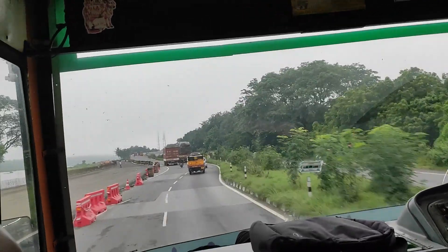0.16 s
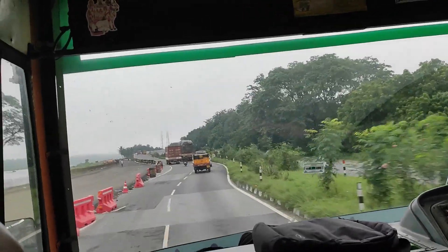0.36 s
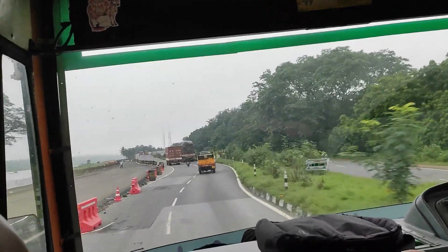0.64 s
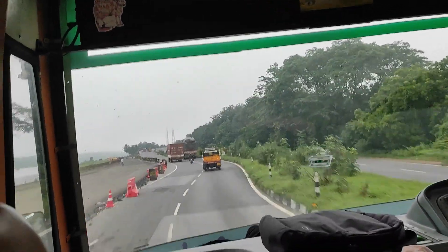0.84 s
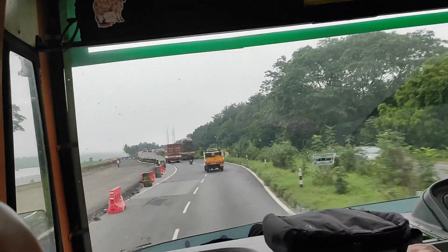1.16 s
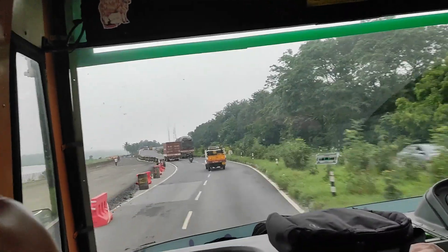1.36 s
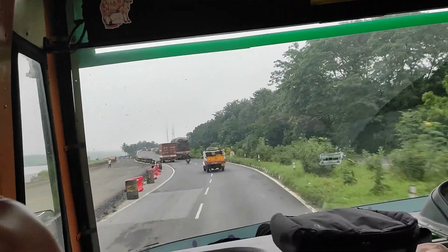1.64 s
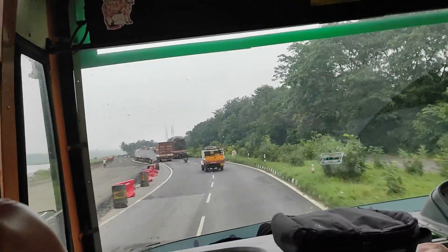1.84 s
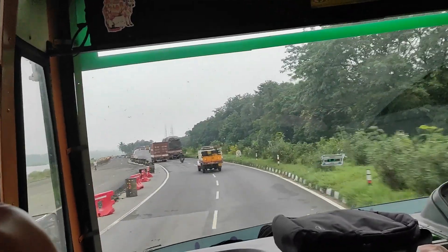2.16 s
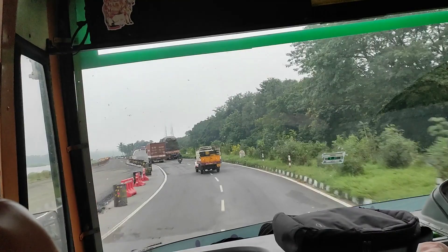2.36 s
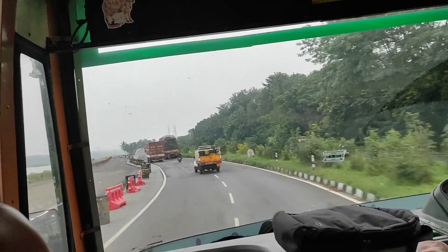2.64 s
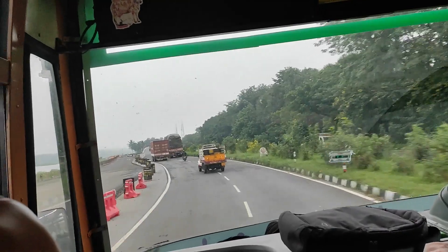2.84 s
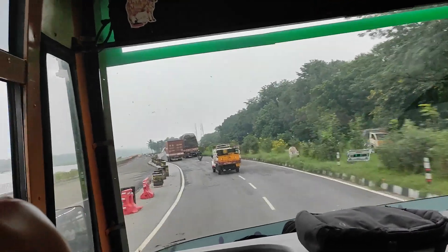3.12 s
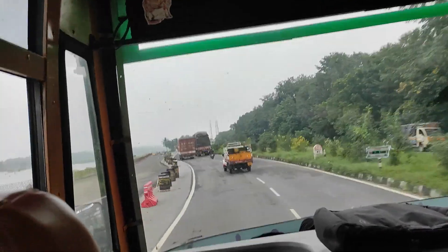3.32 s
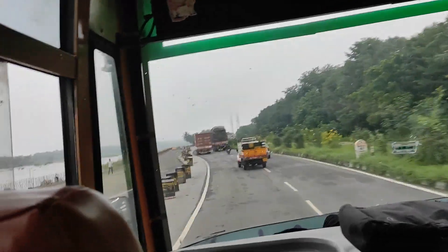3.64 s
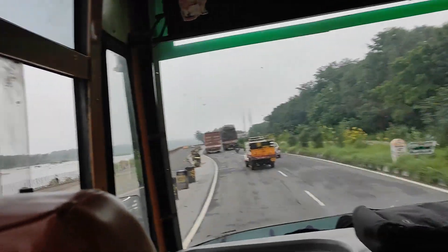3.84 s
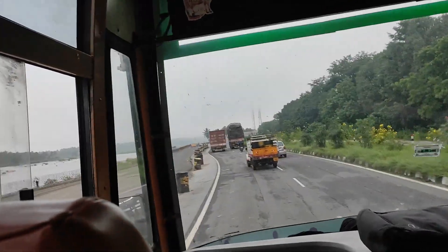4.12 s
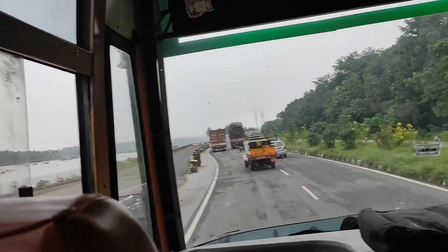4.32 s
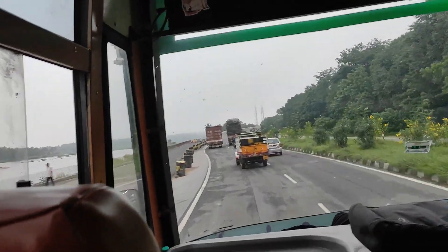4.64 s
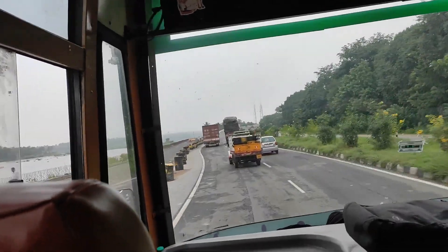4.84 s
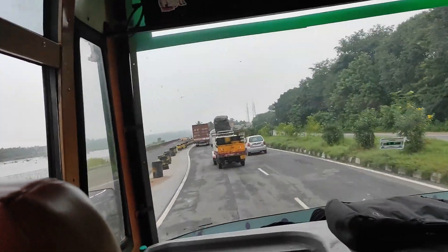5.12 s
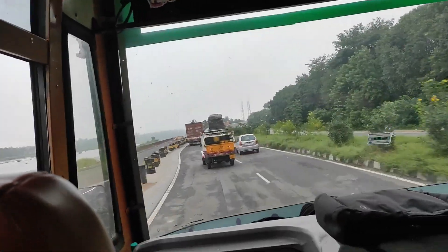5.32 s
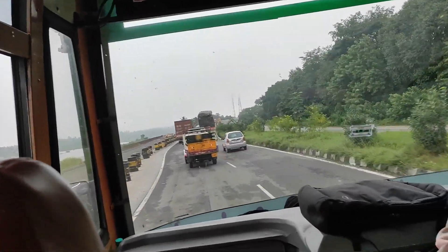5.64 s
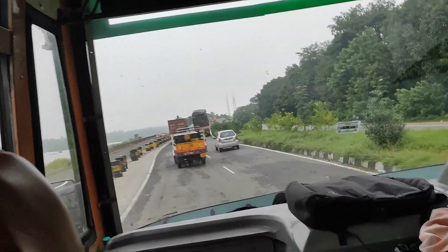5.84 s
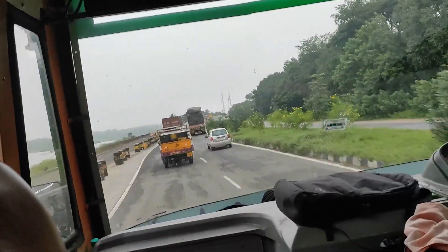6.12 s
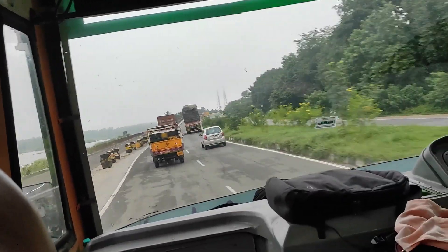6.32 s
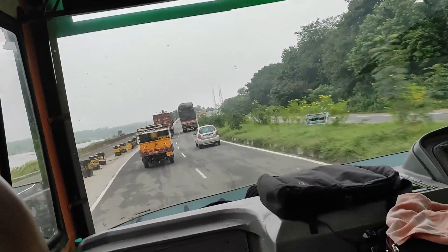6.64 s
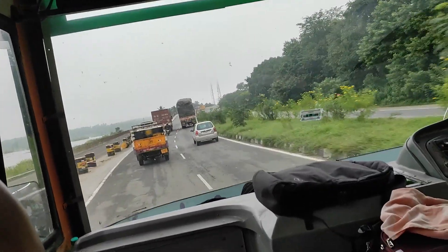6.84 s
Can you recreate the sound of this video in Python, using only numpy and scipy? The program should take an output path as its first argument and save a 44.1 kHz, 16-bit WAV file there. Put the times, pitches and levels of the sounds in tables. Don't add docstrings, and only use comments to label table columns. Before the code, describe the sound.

A close, boomy bus cab on a highway: deep uneven shell thumps, tyre roar and soft air hiss. Engine load rises, one quick, bright, buzzing horn blast bursts out above it, and the background dips briefly. A dull bouncing panel knock follows. Later the ride is slightly calmer, with a sinking driveline hum, gritty rattles, tiny metallic pings and growling tyres, until the throttle opens at the end.

```python
import sys
import numpy as np
from scipy import signal
from scipy.fft import rfft, irfft, next_fast_len
from scipy.io import wavfile
from scipy.ndimage import uniform_filter1d

SR = 44100
rng = np.random.default_rng(int(sys.argv[2]) if len(sys.argv) > 2 else 0)


def transcribe(u):
    v = np.clip(np.atleast_2d(u).T, -1, 1)
    q = np.round(v * 32767).astype(np.int16)
    wavfile.write(sys.argv[1], SR, q)


def volts(x):
    e = np.asarray(x, float) / 20
    return 10 ** e


N = 307813
T = np.arange(N) / SR
M = next_fast_len(N)
HZ = np.maximum(np.arange(M // 2 + 1) * SR / M, 1)

# [t/s, effort above cruising/dB]
EFFORT = [(0, 1.5), (.43, 1), (.8, 4.5), (1.4, 6.5), (2.2, 5.5), (2.72, 6), (3.1, 2.5), (3.4, -0.2),
          (3.7, 4.5), (3.85, 0.5), (4.6, -1.1), (5.2, 0.9), (5.72, -1.9), (6.2, -3), (6.6, -0.2), (6.98, 2)]
# starts, rise, ends, fall, all in s
REED_S = (2.79, 0.036, 2.924, 0.125)
SECOND_S = (2.79, 0.02, 2.838, 0.03)


def unit(x):
    return x / np.sqrt(np.mean(x ** 2))


def curve(rows):
    s, *columns = np.transpose(rows)
    return [np.interp(T, s, c) for c in columns]


def at(rows, hz):
    f, db = np.transpose([row[:2] for row in rows])
    return np.interp(np.log(hz), np.log(f), db)


def gain_of(rows):
    return volts(at(rows, HZ))


def sound(spectrum):
    return irfft(spectrum, M)[..., :N]


def shaped(x, gain):
    return sound(rfft(x, M) * gain)


def ring(hz, width):
    return 1 / (1 + 1j * (HZ ** 2 - hz ** 2) / (HZ * width))


def smooth_twice(x, k):
    return uniform_filter1d(uniform_filter1d(x, k), k)


def walk(rate):
    k = int(SR / rate)
    held = np.repeat(rng.standard_normal(N // k + 1), k)
    return unit(smooth_twice(held, k)[:N])


def gate(on, rise, off, fall):
    return np.clip(np.minimum((T - on) / rise, 1 - (T - off) / fall), 0, 1)


def swells(rows):
    return sum(size * np.exp(-((T - s) / half) ** 2) for s, size, half in rows)


def dying(s, fade, hold=0):
    return (T >= s) * np.exp(-np.maximum(T - s - hold, 0) / fade)


def ports():
    # [f/Hz, level/dB]
    side_share = [(25, -30), (60, -38), (130, -10.5), (280, -10.5), (620, -2), (1300, 1.5), (2900, -1),
                  (6300, 0), (13700, -1.5)]
    # [f/Hz, level/dB]
    lean = [(60, 1), (110, 2.5), (200, 0), (370, -0.5), (670, 1.5), (1230, -1), (2250, 0), (4110, -4.5),
            (7510, 2.5), (13700, -4)]
    mid, side = rfft(rng.standard_normal((2, M)))
    side = side * gain_of(side_share)
    lag = np.exp(-1j * np.pi * HZ * 0.0001 * np.exp(-HZ / 1500))
    lean_db = at([(25, 0.7)] + list(lean), HZ)
    return np.array([(mid + side) * lag, (mid - side) / lag]) * volts(np.outer([0.5, -0.5], lean_db))


def cabin():
    # [f/Hz, level per Hz/dB]
    roar = [(32, -14.5), (55, 0), (65, -4), (111, -5.5), (163, -13.5), (193, -13.5), (265, -19.5),
            (298, -18.5), (438, -22), (509, -25), (688, -26.5), (1180, -32), (3000, -41), (3900, -71),
            (6600, -120)]
    # [f/Hz, level per Hz/dB]
    ports_early = [(3000, 0.5), (4500, -6.5), (6000, -10), (7500, -12), (9000, -17.5), (9600, -26),
                   (10600, -22), (11500, -19.5), (12500, -16), (14300, -27)]
    ports_late = [(3000, 0.5), (4500, -7), (5700, -7.5), (7000, -5), (7800, -10), (8500, -15.5),
                  (9500, -16), (10300, -17.5), (12000, -15), (14300, -16)]
    # [t/s, level/dB, half length/s]
    patches = [(.02, 5, 0.034), (.23, 0.5, .04), (.31, -4.5, .03), (.43, 2.5, 0.065), (.98, -2, 0.025),
               (1.14, 1, 0.11), (2.14, 3, .05), (2.35, 1.5, 0.035), (2.5, -2.5, 0.1), (2.62, -2.5, 0.025),
               (3.25, 2, 0.086), (3.65, 1.5, 0.096), (4.16, -1, 0.035), (4.37, -3, 0.08), (4.8, 0.5, 0.18),
               (5.25, 2, 0.046), (5.42, -3.5, 0.093), (5.7, 0.5, 0.042), (6.36, -4, 0.19), (6.73, 1, 0.08)]
    # [t/s, level/dB, half length/s]
    surges = [
        (.75, 2.5, .08),
        (1.45, 4, 0.048),
        (1.9, -0.5, 0.087),
        (2.5, 1, .05),
        (4.7, 0, .06),
        (6.35, 1.5, 0.031),
    ]
    # [t/s, level/dB, half length/s]
    draughts = [
        (3.78, -2.5, 0.084),
        (3.9, 2, .06),
        (4.76, 2, 0.13),
        (5.15, 4, 0.21),
        (6.03, 3.5, 0.11),
        (6.9, 2.5, 0.29),
    ]
    ride_hz = (140, 1400, 7000)
    effort_share = (-0.066, 0.85, 1.24)
    own = [0.82 * walk(8) + swells(patches), swells(surges), swells(draughts)]
    swell = np.outer(effort_share, curve(EFFORT)[0]) + own
    air = ports() * gain_of([(35, -40)] + [row for row in roar if row[0] < 3100])
    turned = np.interp(T, (3.7, 3.76), (0, 1))
    air = (1 - turned) * sound(air * gain_of(ports_early)) + turned * sound(air * gain_of(ports_late))
    air = rfft(air / np.std(air.mean(axis=0)), M)
    total, place = 0, np.log(HZ / 40) * 2
    for k in range(13):
        share = np.interp(np.log(40) + k / 2, np.log(ride_hz), np.arange(3))
        weights = np.clip(1 - np.abs(share - np.arange(3)), 0, 1)
        part = sound(air * np.cos(np.pi / 2 * np.clip(place - k, -1, 1)) ** 2)
        if k < 4:
            size = uniform_filter1d(part.mean(axis=0) ** 2, SR // 8)
            part = part * (size.mean() / size) ** 0.25
        total = total + part * volts(weights @ swell + 1.16 * walk(9))
    return total * volts(-23)


def boom():
    # [f/Hz, level per Hz/dB]
    shell = [(8, -10.5), (14, 0.5), (26, 5), (36, 1.5), (48, -9.5), (62, -32)]
    # [t/s, level/dB, half length/s]
    bumps = [(0, -12.5, 0.096), (0.186, -11, 0.019), (0.306, -13, 0.097), (0.455, -8, 0.019),
             (0.547, -20.5, 0.084), (0.846, -14.5, 0.13), (1.09, -12, 0.052), (1.207, -14.5, 0.04),
             (1.485, -9.5, 0.21), (1.96, -12.5, 0.17), (2.272, -14.0, 0.06), (2.376, -9.5, 0.021),
             (2.516, -16, 0.082), (2.75, -12.5, 0.053), (3.0, -12.5, 0.16), (3.347, -11.5, 0.1),
             (3.577, -9, 0.1), (3.914, -19.5, 0.24), (4.115, -17, 0.047), (4.405, -15.5, 0.097),
             (4.669, -11.5, 0.11), (4.901, -7.5, 0.06), (5.15, -15, 0.19), (5.454, -16, 0.11),
             (5.679, -12.5, 0.059), (5.877, -12, 0.039), (6.055, -11.5, 0.068), (6.31, -16.0, 0.11),
             (6.673, -22.5, 0.23), (6.956, -11, 0.021)]
    x = sound(ports() * gain_of(list(shell) + [(120, -72)]))
    size = np.sqrt(smooth_twice(x.mean(axis=0) ** 2, int(0.054 * SR)))
    even = unit(x / (size + 0.051 * size.mean()))
    return even * (volts(-30) + swells([(s, volts(db), half) for s, db, half in bumps]))


def intake(throttle, modes):
    firing_hz = 69.3 * (1 + 0.045 * walk(31.7))
    throb = 1 + 0.2 * np.sin(2 * np.pi * np.cumsum(firing_hz) / SR)
    air = ports()
    ducts = 0
    for f, width, db in modes:
        ducts = ducts + volts(db + 1.7 * walk(16) + 1.5 * walk(3)) * unit(sound(air * ring(f, width) ** 2))
    effort = curve(EFFORT)[0]
    opened = gate(*throttle)
    return ducts * throb * volts(-32 * (1 - opened) ** 2 + 1.3 * (effort - effort[opened > 0].max()))


def engine():
    # [f/Hz, width/Hz, level/dB]
    first = [(239.8, 11, -43.5), (280.8, 7.9, -40.5), (349.2, 13.5, -40), (2294, 100, -46.5),
             (2842, 120, -45), (5210, 610, -45.5), (6800, 750, -50), (12400, 1200, -69)]
    # [f/Hz, width/Hz, level/dB]
    later = [(990, 160, -40), (1635, 270, -41.5), (5250, 880, -47.5), (6670, 720, -50.5)]
    return intake((0.32, 0.6, 2.8, 0.14), first) + intake((6.35, 0.27, 7.5, 0.2), later)


def drone():
    # [t/s, f/Hz, level/dB]
    hum = [
        (3.2, 191, -63),
        (3.6, 191.3, -42),
        (4.4, 186.7, -39),
        (5.1, 184.9, -41.5),
        (5.6, 181.3, -33),
        (6.45, 178, -32),
        (6.65, 177, -57),
    ]
    hz, db = curve(hum)
    level = np.sqrt(2) * volts(db + 1.9 * walk(17))
    return level * np.sin(2 * np.pi * np.cumsum(hz * (1 + 0.0086 * walk(20))) / SR)


def reed_overtones(span, turn, free, waver):
    # [multiple of the reed's pitch, level/dB, left minus right/dB]
    trumpet = np.array([(2, -14, 7), (3, 1, -1), (4, -6, -10), (5, -7.5, 11), (6, 0.5, -4), (7, -1, -5),
                        (8, -7.5, 1), (9, -17, -1), (10, -11.5, -4), (11, -11, 0), (12, -10, 0),
                        (13, -9.5, -1), (14, -14.5, 4), (15, -24, -1), (16, -19.5, 0.5), (17, -17.5, -3),
                        (18, -21, 7), (19, -15, 6), (20, -33, 0)])
    order = np.arange(2, 49)[:, None]
    buzz = np.arange(len(order) - len(trumpet))
    buzz_db = -23 - 0.43 * buzz + 2.5 * rng.standard_normal(len(buzz))
    buzz_lean_db = 5 + 5 * rng.standard_normal(len(buzz))
    db = np.append(trumpet[:, 1], buzz_db)[:, None]
    lean_db = np.append(trumpet[:, 2], buzz_lean_db)[:, None]
    blow_db = -2.5 - 8 * free - 46.5 * (1 - gate(*REED_S)[span]) ** 1.24
    follow = (0.75 + 0.02 * np.minimum(order, 16)) * rng.uniform(0.76, 1.15, order.shape)
    level_db = -19.5 + db + blow_db * follow
    level_db = level_db - 6 * gate(*SECOND_S)[span] * (order < 6) + (1.3 + 2.5 * free) * waver
    since = np.maximum(T[span] - REED_S[0], 0)
    flutter = 0.075 + 0.85 * np.exp(-(since / 0.06) ** 2) + 0.22 * free
    rasp = unit(uniform_filter1d(rng.standard_normal((2, len(order), span.sum())), 110))
    share = np.clip(flutter * (0.4 + np.minimum(order, 13) / 12), 0, 0.95)
    start = 2 * np.pi * rng.random(order.shape)
    skew = np.clip(order / 6.5, 0, 1) * rng.uniform(0.56, 1.22, order.shape)
    level_db = level_db - 20 * np.log10(np.abs(np.cos(skew - 1j * np.log(volts(lean_db / 2)))))
    reed = np.zeros((2, N))
    for port, sign in enumerate((1, -1)):
        phase = order * turn + start + sign * skew
        wave = (np.sqrt(1 - share ** 2) + 1.15 * share * rasp[0]) * np.sin(phase)
        wave = wave + 0.93 * share * rasp[1] * np.cos(phase)
        reed[port, span] = np.sum(volts(level_db + sign * lean_db / 2) * wave, axis=0)
    return reed


def second_mode(span, turn, waver):
    # [multiple of the reed's pitch added, level/dB]
    beats = [(-1, -18), (0, -2.5), (1, -4), (2, -8.5), (3, -11)]
    since = T[span] - SECOND_S[0]
    glide = 720 + 34.8 * np.exp(-since / 0.018) + 5 * waver
    phase = 2 * np.pi * np.cumsum(glide) / SR
    joined = np.clip((since - 0.015) / 0.015, 0, 1)
    tone = sum(volts(db) * joined ** (k > 0) * np.sin(phase + k * turn) for k, db in beats)
    held = gate(*SECOND_S)[span]
    return tone * volts(-19 - 35 * (1 - held) ** 1.7) * (held > 0)


def valve():
    # [f/Hz, level per Hz/dB]
    hiss = [(1500, -1), (4000, -3), (6000, -4), (8500, 2), (9800, -2), (11000, -1.5), (13000, 4),
            (14300, -5)]
    opens, rise = 2.74, 0.041
    leak = unit(sound(ports() * gain_of([(300, -54.5)] + list(hiss))))
    return leak * gate(opens, rise, 2.94, 0.05) * volts(-25.5 - 190 * np.maximum(T - opens - rise, 0))


def horn():
    # [t/s, f/Hz, level/dB]
    pipe_note = [
        (2.79, 320, -56),
        (2.805, 330, -26),
        (2.83, 298, -19),
        (2.88, 296, -23.5),
        (2.945, 307, -21),
        (3.0, 307, -30),
        (3.04, 310, -23.5),
        (3.11, 304.4, -36),
        (3.15, 308, -55),
    ]
    span = (T > pipe_note[0][0]) & (T < pipe_note[-1][0])
    unsettled = np.exp(-np.maximum(T[span] - REED_S[0], 0) / 0.041)
    free = np.clip((T[span] - REED_S[2]) / 0.013, 0, 1)
    turn = 2 * np.pi * np.cumsum(296 - 3.94 * unsettled + 6.4 * free) / SR
    waver = unit(smooth_twice(rng.standard_normal((47, span.sum())), 600))
    reed = reed_overtones(span, turn, free, waver)
    reed[:, span] += second_mode(span, turn, waver[0])
    echoes = rng.standard_normal((2, SR // 2)) * volts(-60 * T[:SR // 2] / 0.15)
    echoes = echoes / np.sqrt(np.sum(echoes[0] ** 2))
    reed = reed + volts(-10) * signal.oaconvolve(reed, echoes, axes=1)[:, :N]
    pipe_hz, pipe_db = (c[span] for c in curve(pipe_note))
    pipe = np.zeros((2, N))
    pipe[:, span] = volts(pipe_db + np.array([[-2], [2]])) * np.sin(2 * np.pi * np.cumsum(pipe_hz) / SR)
    return np.sqrt(2) * (reed + pipe) + valve()


def knocks():
    # [t/s, scrape/dB, fade/s, blow/dB]
    hits = [
        (3.318, -19, 0.022, -21),
        (3.325, -25, .015, -23),
        (3.333, -28, 0.017, -23),
        (3.345, -28, 0.018, -22.5),
        (3.356, -35, 0.022, -22.5),
        (3.371, -36, 0.022, -26),
        (3.385, -36, .012, -31),
    ]
    # [f/Hz, width/Hz, level/dB]
    panel = [(423, 29, -2.5), (617, 38, 3.5), (700, 60, -3), (895, 120, -4), (1114, 27, -6.5),
             (1340, 26, -17), (1480, 39, -13), (1900, 270, -18), (2910, 790, -10.5), (4200, 890, -26)]
    push = sum(volts(db) * dying(s, fade) for s, db, fade, _ in hits)
    body = volts(-0.5) * ring(560, 900) ** 2 / np.sqrt(900)
    for k, (f, width, db) in enumerate(panel):
        body = body + (-1) ** k * volts(db) * ring(f, width) / np.sqrt(width)
    air = unit(sound(ports()))
    drive = air * push
    blow = np.hanning(24)
    for s, _, _, db in hits:
        first = int(s * SR)
        drive[:, first:first + len(blow)] += 1.8 * volts(db) * blow
    return volts(0.5) * shaped(drive, body) / np.std(shaped(air, body))


def rattles():
    # [t/s, level/dB, length/s]
    chatter = [(.75, -50, 0.061), (1.217, -46.5, 0.035), (1.443, -45, .03), (3.325, -50, 0.021),
               (3.64, -54, .03), (3.758, -51, .06), (3.857, -49, 0.09), (4.8, -51, 0.027),
               (5.02, -42.5, .02), (5.108, -44, 0.011), (5.139, -39, 0.034), (5.195, -43, 0.021),
               (5.31, -45, .02), (5.365, -48, .025), (5.425, -50, 0.018), (5.48, -50, .03),
               (5.55, -50, 0.036), (5.686, -47.5, .025), (5.78, -52, .02), (5.86, -53, 0.023),
               (5.968, -50, 0.034), (6.024, -51, .02), (6.075, -48, .03), (6.263, -54, 0.02),
               (6.35, -50, .02), (6.48, -56, 0.021), (6.532, -54, 0.027)]
    # [f/Hz, level per Hz/dB]
    trim = [(700, -14), (1500, 0), (2500, -1), (3800, -3), (5500, -5), (7300, -4), (9000, -15), (12500, -9),
            (14300, -11)]
    bursts = sum(volts(db + 6) * np.interp(T, (s - span, s, s + span), (0, 1, 0)) for s, db, span in chatter)
    grit = unit(sound(ports() * gain_of([(200, -58.5)] + list(trim))))
    return grit * volts(2.5 * walk(300)) * bursts


def pings():
    # [t/s, level/dB]
    ticks = [(3.6481, -54), (3.8496, -50), (4.2567, -49), (4.8, -51), (4.9985, -49), (5.1041, -53),
             (5.1312, -49), (5.1866, -53), (5.278, -50), (5.3028, -50), (5.4161, -54), (5.6835, -51),
             (5.8561, -59), (6.0294, -57), (6.0694, -59), (6.2487, -55), (6.473, -52)]
    size = sum(volts(db + 2.5) * dying(s, 0.006, hold=0.011) for s, db in ticks)
    phase = 2 * np.pi * np.cumsum(13110 + 35 * walk(150)) / SR
    return size * volts(1.5 * walk(120)) * np.sin(phase + np.array([[0], [1.3]]))


def jolts():
    # [t/s, level/dB, fade/s]
    scrapes = [
        (1.42, -38, .04),
        (1.455, -39, .03),
        (1.565, -27, .03),
        (6.248, -36, .015),
        (6.26, -33, 0.019),
        (6.325, -33, 0.021),
    ]
    push = sum(volts(db) * np.clip((T - s) / 0.012, 0, 1) * dying(s, fade) for s, db, fade in scrapes)
    return push * unit(sound(ports() * ring(750, 950) ** 2))


def shudders():
    # [t/s, f/Hz, level/dB, half length/s]
    panels = [(0.203, 85, -28, .08), (0.466, 102, -25.5, 0.084), (.7, 95, -32.5, 0.14),
              (1.12, 112, -28, 0.088), (1.785, 102, -28, 0.073), (2.33, 80, -27, 0.1),
              (2.36, 108, -26.5, 0.074), (2.66, 108, -31, .08), (4.157, 101, -25, 0.096),
              (4.45, 77, -28.5, 0.087), (4.747, 115, -28, .08), (4.85, 80, -28, .1), (5.0, 150, -31, .1),
              (5.93, 206, -34, .12), (5.66, 79, -29, .12), (6.1, 72, -30, 0.11), (6.755, 72, -28, .1),
              (6.817, 132, -30, 0.074)]
    drift = np.cumsum(1 + 0.05 * walk(25)) / SR
    total = 0
    for s, hz, db, half in panels:
        total = total + swells([(s, volts(db), half)]) * np.sin(2 * np.pi * hz * drift)
    return np.sqrt(2) * total


def tyres():
    growl = unit(sound(ports() * ring(288, 220) ** 2))
    return growl * volts(-38 + 1.5 * walk(8)) * gate(5.5, 0.3, 6.45, 0.2)


def scene():
    ride = cabin() + boom() + engine() + drone()
    ride = ride + rattles() + pings() + jolts() + shudders() + tyres()
    bass = shaped(ride, 1 / (1 + (HZ / 600) ** 4))
    ride = ride + bass * (volts(-8 * gate(2.795, 0.03, 3.02, 0.029)) - 1)
    ride = ride * volts(-7 * gate(2.808, 0.027, 2.975, 0.063))
    return ride + horn() + knocks()


def roll_off(x):
    return signal.sosfilt(signal.butter(12, 14290, fs=SR, output="sos"), x)


def record(dry):
    mix = np.tanh(dry * 0.83) / 0.76
    return roll_off(mix)


dry = scene()
out = record(dry)
transcribe(out)
```